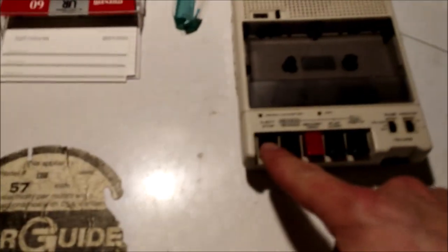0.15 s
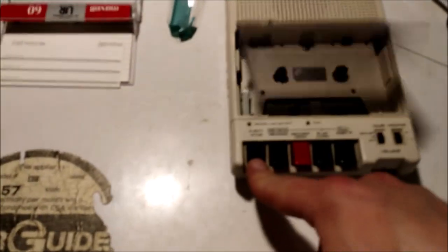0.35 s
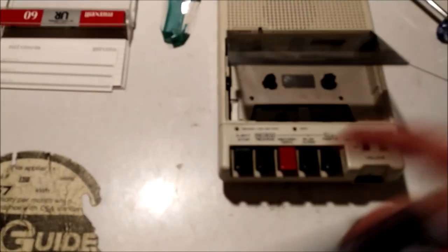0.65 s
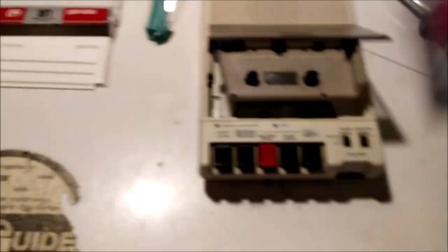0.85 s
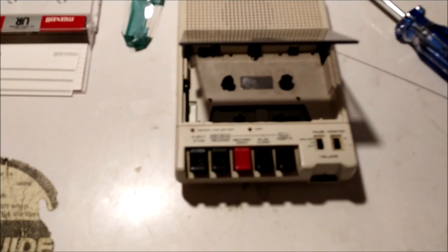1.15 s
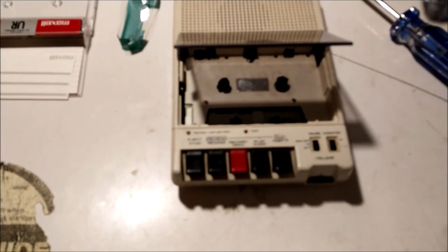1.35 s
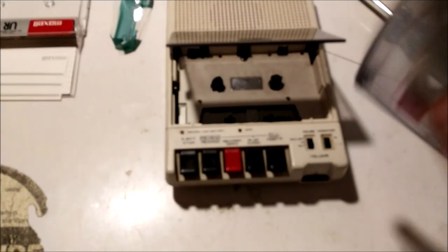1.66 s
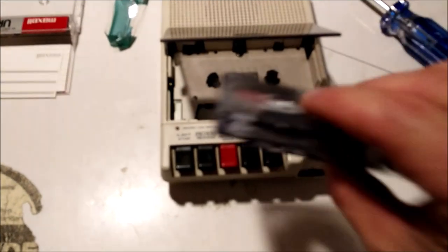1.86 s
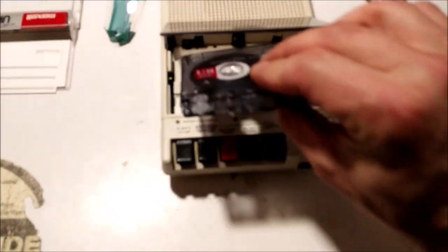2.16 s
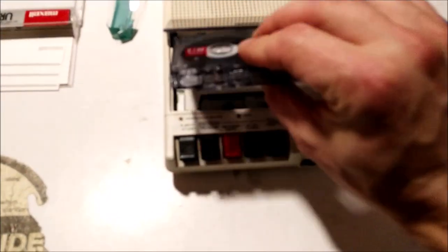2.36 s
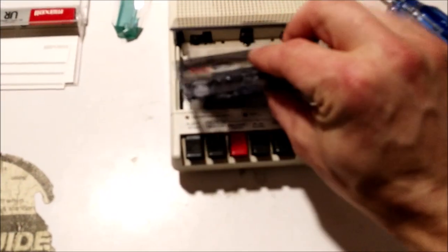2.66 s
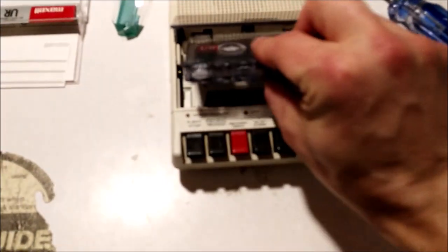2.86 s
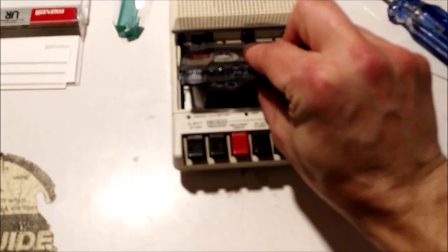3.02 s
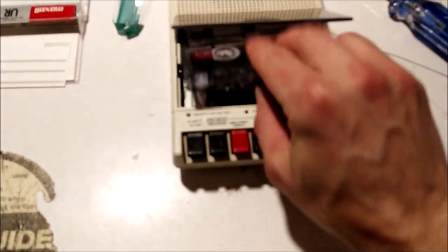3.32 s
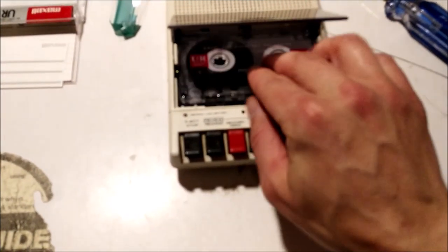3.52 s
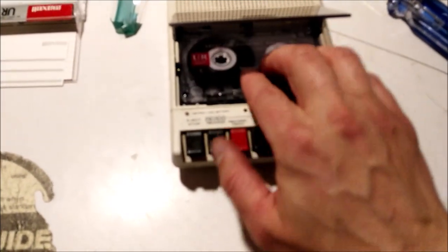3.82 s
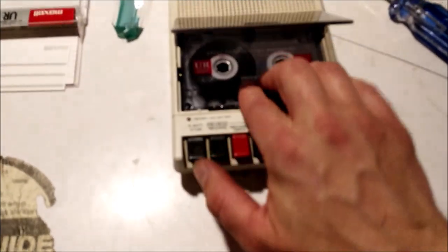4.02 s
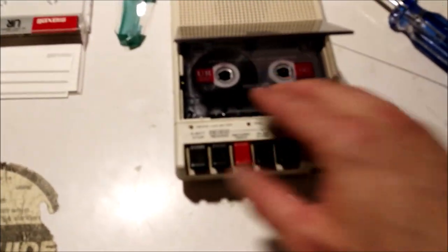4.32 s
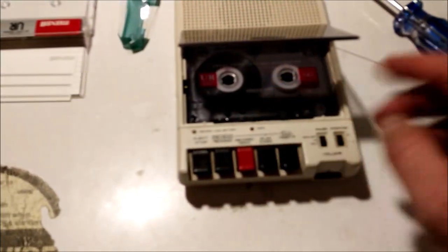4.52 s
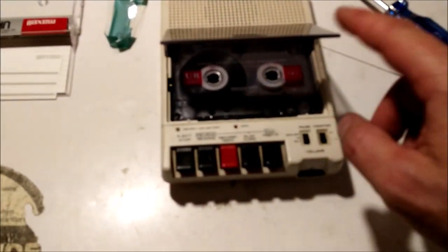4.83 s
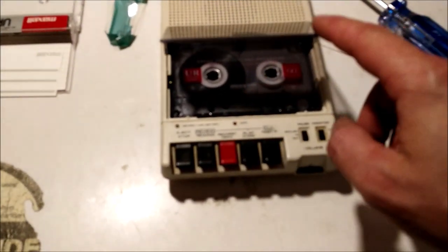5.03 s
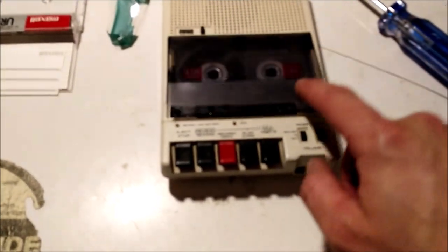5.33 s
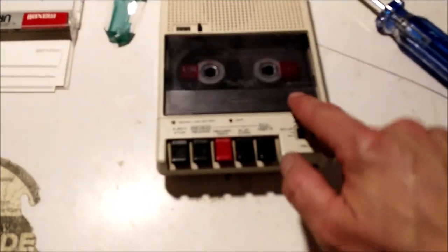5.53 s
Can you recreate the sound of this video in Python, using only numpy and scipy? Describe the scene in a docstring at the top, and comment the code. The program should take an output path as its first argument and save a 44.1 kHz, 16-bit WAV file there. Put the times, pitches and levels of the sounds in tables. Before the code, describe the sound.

A small plastic cassette recorder springs open, a cassette rattles in the hand, is fumbled into place, and the door snaps shut.

```python
"""On a workbench in a quiet, humming room, a small plastic tape recorder springs open and its door bounces.
A cassette rattles in the hand, is fumbled into the well and pressed home, and the door snaps shut.
Each knock is a short chatter of contacts that rings a plastic shell and adds a bright crack; knocks on the
recorder boom in its hollow case and heavy ones thud the bench. Sliding plastic is a dense run of tiny clicks.
The room is shaped noise with wavering hums, and pressure steps make the microphone pop once."""
import sys
import numpy as np
from scipy import signal
from scipy.fft import rfft, irfft
from scipy.io import wavfile
from scipy.ndimage import uniform_filter1d

SR = 44100
rng = np.random.default_rng(int(sys.argv[2]) if len(sys.argv) > 2 else 0)


def invert_db(x):
    """Field ratio 10**(x/20) for x, a level in decibels (scalar or array-like)."""
    u = np.asarray(x, float) / 20
    return 10 ** u


def dump_mix(stems):
    """Bounce the given channels to the path in sys.argv[1] as a 16-bit WAV at rate SR."""
    frames = np.atleast_2d(stems).T  # one column per channel
    limited = np.clip(frames, -1, 1)  # hard clip at full scale
    pcm = np.round(limited * 32767).astype(np.int16)
    wavfile.write(sys.argv[1], SR, pcm)


N = 250488
IN_HAND_S = 0.85, 2.2  # between these times the cassette sounds, otherwise the recorder
SPAN = 8192  # samples worked out for each knock
LEAD = 512  # samples of light brushing before the first contact


def colour(x, points):
    """Shape the tone of x by (Hz, dB) points, with no sound ahead of its cause (minimum phase)."""
    hz, db = np.transpose(points)
    f = np.maximum(np.arange(2049) * SR / 4096, 1)
    log_gain = np.log(invert_db(np.interp(np.log(f), np.log(hz), db)))
    # folding the cepstrum of the log gain gives the phase
    ceps = irfft(log_gain)
    ceps[1:2048] *= 2
    ceps[2049:] = 0
    response = irfft(np.exp(rfft(ceps)))
    return signal.fftconvolve(x, response)[:len(x)]


def level(x, db):
    """Set the rms over the whole length."""
    return x * invert_db(db) / np.sqrt(np.mean(x ** 2))


def peak(x, db, hold_s):
    """Set the loudest short-time rms, averaged over hold_s."""
    return x * invert_db(db) / np.sqrt(uniform_filter1d(x ** 2, int(hold_s * SR)).max())


def ring(modes, scatter_db, detune, snap=0, count=3):
    """Response of a struck body: each mode is a cluster of close ones, weighted anew for each blow."""
    hz, db, t60 = np.repeat(modes, count, axis=0).T[:, :, None]
    t = np.arange(SPAN // 2) / SR
    pitch, strength, sign = rng.standard_normal((3, len(hz), 1))
    waves = np.sin(2 * np.pi * hz * (1 + detune * pitch) * t)
    waves = waves * np.exp(-np.log(1000) * t / t60)
    total = (np.sign(sign) * invert_db(db + scatter_db * strength) * waves).sum(axis=0)
    # extra start, before the bending waves have spread
    return total * (1 + snap * np.exp(-t / 0.0015))


def chatter(size, per_s, spread_db):
    """Tiny contacts at random moments, a few much larger than the rest."""
    touch, sign, big = rng.random((3, size))
    strength = invert_db(-spread_db * np.log(1 - big))
    return (touch < per_s / SR) * np.sign(sign - 0.5) * strength


def add(out, s, x):
    """Mix x in at time s, in seconds."""
    i = int(s * SR)
    out[i:i + len(x)] += x[:len(out) - i]


def radiate(x, low_hz):
    """Small shells send out little bass."""
    return signal.sosfilt(signal.butter(4, low_hz, "high", fs=SR, output="sos"), x)


# Treble of meeting edges, relative: f/Hz, level per Hz on the recorder/dB, level per Hz on the cassette/dB
EDGE_TREBLE = [(1200, -35, -61), (2830, 4, -6.5), (4555, 5.5, 4.5), (6940, 2.5, -5.5), (9060, -2, -8),
               (12060, 2, -2), (12660, 6, -14), (14200, 3.5, -2)]


def edge(held):
    """Treble colour of the thing that is struck: cassette if held, else recorder."""
    return np.array(EDGE_TREBLE)[:, [0, 2 if held else 1]]


# Ways the recorder's shell rings: f/Hz, relative level/dB, time to fall by 60 dB/s
RECORDER_MODES = [(724, -9, 0.053), (952.5, -6.5, 0.076), (1342.7, -3, 0.072), (1610, -2, 0.077),
                  (1830, -4.5, 0.073), (2090, -1, 0.057), (2344, -11.5, 0.12), (2632, 0.5, 0.034),
                  (3165, -32, .03), (3330, -9, 0.02), (4200, -14.5, 0.011)]
# Ways the cassette's shell rings: f/Hz, relative level/dB, time to fall by 60 dB/s
CASSETTE_MODES = [(946, -25, 0.035), (1238, -10, 0.027), (1430, 0, 0.06), (1660, -6, 0.045),
                  (1846, -5, 0.03), (2190, -3, 0.073), (2580, -11, 0.072), (2780, -17, 0.042),
                  (3370, -9, 0.033)]
# Plastic knocks, without the room's tail: t/s, level/dB, f/Hz of the leading ring (varies a little),
# treble crack over the ring/dB, time scale of the chatter/ms (it stops after 2.5 of these)
PLASTIC_KNOCKS = [(0.254, -26, 2500, -22.5, 2.7), (0.422, -36, 1330, -12.5, 2.26),
                  (0.46, -36.5, 1285, -2, 12), (0.492, -28.5, 1580, -5, 4.8), (0.523, -20, 2150, -9.5, 2),
                  (0.532, -24.5, 1490, -7.5, 8.6), (0.612, -33, 1890, -37, 0.99),
                  (0.646, -25, 1630, -10, 2.46), (0.657, -25, 2190, -5, 7), (0.682, -29.5, 1433, -10.5, 11),
                  (0.698, -32.5, 1650, 2, 4.2), (0.708, -23, 2040, 0.5, 3.6), (0.75, -34, 2400, -35, 2.4),
                  (0.774, -25.5, 2170, -11.5, 3.2), (0.789, -31.5, 1400, -4, 4),
                  (0.83, -35.5, 1430, -32, 3.3), (0.855, -37.5, 1500, -48, 3.9),
                  (0.893, -31.5, 1760, -39, 4.8), (0.919, -28.5, 1610, -45, 0.65),
                  (0.929, -12.5, 1426, -21, 1.7), (0.94, -36, 1850, -12.5, 3.1),
                  (0.987, -27, 1720, -10.5, 1.9), (1.019, -32, 1390, -16.5, 9.5),
                  (1.025, -14.5, 1550, -21, 1.28), (1.066, -31.5, 1800, -17, 1.2),
                  (1.097, -26.5, 1820, -15, 2.3), (1.134, -28.5, 1710, -10, 9.4),
                  (1.145, -14, 1990, -10.5, 0.81), (1.154, -26.5, 1710, -7, 5.2),
                  (1.165, -18.5, 1680, -12.5, 2), (1.181, -21, 1540, -18, 3.1),
                  (1.593, -44.5, 2684, -10, 3), (1.628, -42, 1660, -45, 0.88), (1.686, -27, 1514, -9, 25),
                  (1.7, -26, 2430, -6.5, 2.5), (1.71, -17.5, 1830, -16, 2),
                  (1.721, -15.5, 1600, -13.5, 2.5), (1.74, -22.5, 1343, -13.5, 3.9),
                  (1.77, -12.5, 1760, -14, 0.87), (1.833, -32.5, 1390, -20, 12.6),
                  (1.864, -17.5, 1630, -16, 1.1), (1.87, -19, 1860, -12.5, 5.4),
                  (1.884, -25, 1610, -42, 2.4), (1.903, -21.5, 1600, -15, 3.4),
                  (1.97, -38.5, 1560, -45, 10), (2.018, -35, 1660, -20, 0.51),
                  (2.031, -22.5, 1680, -17, 0.58), (2.04, -23.5, 1700, -21, 0.99),
                  (2.446, -34, 1620, -15, 7.5), (2.449, -38.5, 5820, -17, 5.7),
                  (2.488, -28.5, 1680, -20, 3.1), (2.52, -27.5, 1560, -17.5, 4.1),
                  (2.591, -43, 4000, 0.5, 10.6), (2.703, -26.5, 1470, -18, 2.7),
                  (2.721, -31.5, 1200, -20, 2.9), (2.738, -27, 1670, -18.5, 2.8),
                  (2.832, -25.5, 1275, -12.5, 9.1), (2.913, -24, 1695, -24, 2.94),
                  (3.015, -31, 1460, -27.5, 3.9), (3.079, -23, 2090, -6, 2.36),
                  (3.136, -13.5, 1296, -9.5, 3.2), (3.149, -24, 2007, -16.5, 14.5),
                  (3.189, -25.5, 1870, -13.5, 2), (3.208, -30.5, 2280, -13, 5.7),
                  (3.29, -22.5, 1460, -15, 2.25), (3.301, -24.5, 2030, -18.5, 4),
                  (3.318, -34.5, 1403, -9, 7.8), (3.443, -42.5, 960, -21, 6.7),
                  (3.475, -30.5, 1404, -16, 2.9), (3.572, -26, 1450, 1, 6.6), (3.584, -15, 2170, -9, 7.2),
                  (3.602, -17, 2090, -1, 3.5), (3.618, -19, 1516, -16, 4.5), (3.63, -29, 2690, -4.5, 1.7),
                  (3.648, -29.5, 1870, -15, 2.4), (4.055, -33, 1430, -13, 4.8),
                  (4.067, -21.5, 2220, -4.5, 2.9), (4.081, -11.5, 2110, -6.5, 1.18),
                  (4.102, -24.5, 1430, -29.5, 4), (4.371, -47, 2220, -5, 0.61),
                  (4.454, -49, 1870, -6.5, 3.1), (5.542, -27, 1460, -7, 3.2), (5.577, -50.5, 1330, 1, 12),
                  (5.597, -9, 1500, -4.5, 3.3), (5.605, -20.5, 1300, -16, 5)]


def knocks():
    """Contacts that swell and die quickly drive the ring of a shell; a noisy crack follows their energy."""
    graze_db, graze_s = -27, 0.004  # parts brush just before they meet: last level, rise time
    out = np.zeros(N)
    t = np.arange(SPAN) / SR
    since = t - LEAD / SR
    graze = invert_db(graze_db) * np.exp(np.minimum(since, 0) / graze_s)
    for s, db, hz, crack_db, ms in PLASTIC_KNOCKS:
        held = IN_HAND_S[0] < s < IN_HAND_S[1]
        age = np.maximum(since, 0) * 1000 / ms
        fade = np.minimum(0.74 + age / 0.67, 1) * np.exp(-age / 1.58) * (age < 2.5)
        push = chatter(SPAN, 1500, 3.06) * np.where(since < 0, graze, fade)
        push[LEAD] = 2.5 / ms  # a short knock is mostly its first contact

        modes = CASSETTE_MODES if held else RECORDER_MODES
        shell = ring(modes, 1.2, 0.09, snap=2.0 / ms, count=12)
        # the part that is struck leads
        panel = ring([(hz, 14, 0.02)], 0.91, 0.029, snap=2.76 / ms, count=3)
        body = signal.fftconvolve(push, shell + panel)[:SPAN]
        body = radiate(body, 1050 if held else 700)

        # many short treble modes blur into noise with a fast and a slow fall
        decay = np.exp(-t / 0.00087) + 0.088 * np.exp(-t / 0.0039)
        energy = signal.fftconvolve(push ** 2, decay)[:SPAN]
        crack = colour(np.sqrt(np.abs(energy)) * rng.standard_normal(SPAN), edge(held))
        both = peak(body, db, 0.0014) + peak(crack, db + crack_db, 0.0018)
        # the first contact comes 0.8 ms before the listed time
        add(out, s - 0.0008 - LEAD / SR, both)
    return out


# Ways the hollow case booms: f/Hz, relative level/dB, time to fall by 60 dB/s
HOLLOW_MODES = [(224, -3, 0.14), (268.2, -3, 0.18), (348, -1.5, 0.14), (455.2, -1, 0.091),
                (589, -9.5, 0.013), (655, 4, 0.08), (802, -2.5, 0.11), (960, -9, 0.1)]


def booms():
    """Every knock on the recorder is also a short push that booms in its hollow case."""
    boom_db, boom_slope = -9, 1.213  # level for a 0 dB knock, dB gained per dB of knock
    out = np.zeros(N)
    push = np.hanning(int(0.0012 * SR))
    for s, db, *_ in PLASTIC_KNOCKS:
        if not IN_HAND_S[0] < s < IN_HAND_S[1]:
            boom = np.convolve(ring(HOLLOW_MODES, 0.73, 0.1, count=4), push)
            add(out, s, peak(boom, boom_db + boom_slope * db, 0.0023))
    return out


# Ways the bench top swings: f/Hz, relative level/dB, time to fall by 60 dB/s
BENCH_MODES = [(70, -7, 0.11), (118.6, -3, 0.15), (132.2, -8, 0.21)]
# Thuds through the bench: t/s, level/dB
BENCH_THUDS = [(0.46, -51), (0.495, -44), (0.522, -24.5), (0.563, -38), (0.647, -27.5), (0.702, -39),
               (0.781, -37), (2.594, -39.5), (2.701, -44.5), (2.737, -42), (3.076, -37.5), (3.134, -42),
               (3.19, -57), (3.287, -35.5), (3.375, -41), (3.572, -33), (3.603, -29), (4.082, -27),
               (4.149, -39.5), (5.597, -23)]


def thuds():
    """A slow push swings the bench top."""
    out = np.zeros(N)
    push = np.hanning(int(0.0069 * SR))
    for s, db in BENCH_THUDS:
        board = np.convolve(ring(BENCH_MODES, 2.7, 0.1, count=4), push)
        add(out, s, peak(board, db, 0.0091))
    return out


# Plastic sliding on plastic, the level of its shell tone without the room's tail: t/s, level/dB
SLIDE_LEVELS = [(.4, -69), (.48, -44), (.63, -62), (.68, -38), (.87, -57.5), (1.16, -55), (1.299, -88),
                (1.551, -65.5), (1.82, -46.5), (2.1, -69), (2.42, -89), (2.5, -55.5), (2.65, -80),
                (2.8, -51), (2.969, -78), (3.14, -42.5), (3.3, -50), (3.5, -54), (3.56, -39), (3.76, -77)]


def slide():
    """Dense stick-slip clicks into the shell that is being handled, with a rustle of grit above."""
    uneven_db, uneven_s = 4, 0.013  # how much and how fast friction varies
    rumble_db = -6  # bench rumble against the shell tone, on the recorder only
    grit_recorder_db, grit_hand_db = -10.5, -13.5  # rustle against the shell tone
    t = np.arange(N) / SR
    s, db = np.transpose(SLIDE_LEVELS)
    on = (t > s[0]) * (t < s[-1])
    held = (t > IN_HAND_S[0]) & (t < IN_HAND_S[1])
    friction = level(uniform_filter1d(rng.standard_normal(N), int(uneven_s * SR)), 0)
    slips = chatter(N, 2500, 1.8) * invert_db(uneven_db * friction)

    # the contact point keeps moving, so the shell's modes blur into their outline
    tones = []
    for modes in (RECORDER_MODES, CASSETTE_MODES):
        outline = [(300, -30), *np.array(modes)[:, :2], (7000, -40)]
        tones.append(level(colour(slips, outline), 0))
    recorder, cassette = tones
    rumble = colour(slips, [(40, -8), (80, 0), (200, -4), (500, -13.5), (1000, -40.5)])
    shell = np.where(held, cassette, recorder + level(rumble, rumble_db))
    grit = level(colour(slips + 0.8 * rng.standard_normal(N), edge(False)), 0)
    grit = grit * invert_db(np.where(held, grit_hand_db, grit_recorder_db))
    return on * invert_db(np.interp(t, s, db)) * (shell + grit)


# Pressure steps on the microphone: t/s, level/dB
PRESSURE_STEPS = [(1.2819, -12.9), (1.3081, -33)]


def pops():
    """Sudden, slightly rounded pressure steps; the microphone's low cut makes them a click and a short swing."""
    step = np.zeros(N)
    for s, db in PRESSURE_STEPS:
        step[int(s * SR):] += invert_db(db)
    return signal.lfilter([0.3], [1, -0.7], step)


# Tone of the room noise: f/Hz, relative level per Hz/dB
ROOM_TONE = [(80, -14.5), (150, -0.5), (240, -1.5), (320, -4), (900, -7), (2000, -14), (3200, -19),
             (5000, -22.5), (8300, -28.5), (10000, -22.5), (14000, -26)]
# Machine hums: f/Hz, level/dB, width of each of two filter passes/Hz
ROOM_HUMS = [(53.8, -54, 20), (188.5, -74, 5.3), (236.8, -71.5, 4.1), (2100, -82, 3.3), (6810, -87.5, 3.7)]


def room():
    """Broad hiss and rumble, with wavering machine hums made of narrowly filtered noise."""
    tone = [(20, 5), (40, 4), (60, -7)] + list(ROOM_TONE)
    out = level(colour(rng.standard_normal(N), tone), -60.5)
    for hz, db, width in ROOM_HUMS:
        b, a = signal.iirpeak(hz, hz / width, SR)
        once = signal.lfilter(b, a, rng.standard_normal(N))
        out = out + level(signal.lfilter(b, a, once), db)
    return out


def walls(x, t60, wet_db):
    """Small-room tail: noise that dies away, duller than the direct sound."""
    t = np.arange(int(0.4 * SR)) / SR
    tail = rng.standard_normal(len(t)) * np.exp(-np.log(1000) * t / t60) * (t > 0.004)
    tail = colour(tail, [(200, 19.5), (2000, -6.5), (6000, 1.0), (14000, -0.5)])
    tail = tail / np.sqrt(np.sum(tail ** 2))
    return x + invert_db(wet_db) * signal.fftconvolve(x, tail)[:N]


def scene():
    """All sources at one microphone; knocks and slides also excite the room."""
    plastic = walls(knocks() + slide(), t60=0.17, wet_db=-10.0)
    low = booms() + thuds()
    return (plastic + low + pops() + room())[None]


def band_limit(x):
    """A steep low-pass at the top of the band."""
    return signal.sosfilt(signal.butter(12, 15620, fs=SR, output="sos"), x)


def record(dry):
    """The microphone's steep low cut, then a steep top cut."""
    low_cut = signal.butter(5, 52, "high", fs=SR, output="sos")
    top_cut = signal.ellip(10, 0.3, 45, 14300, fs=SR, output="sos")
    mix = signal.sosfilt(top_cut, signal.sosfilt(low_cut, dry))
    return band_limit(mix)


dry = scene()
out = record(dry)
dump_mix(out)
```